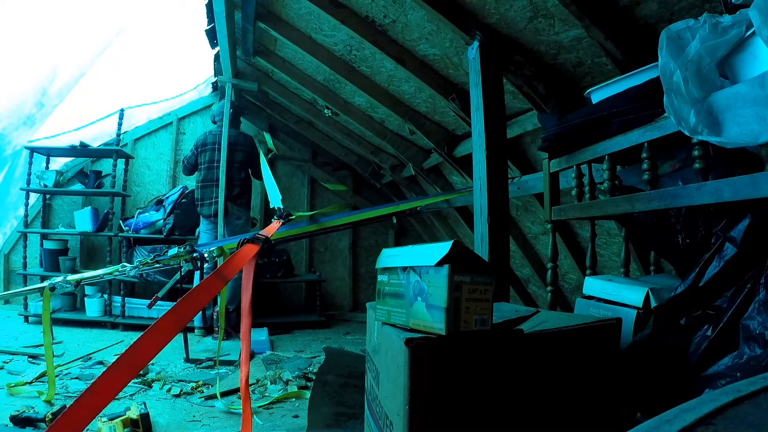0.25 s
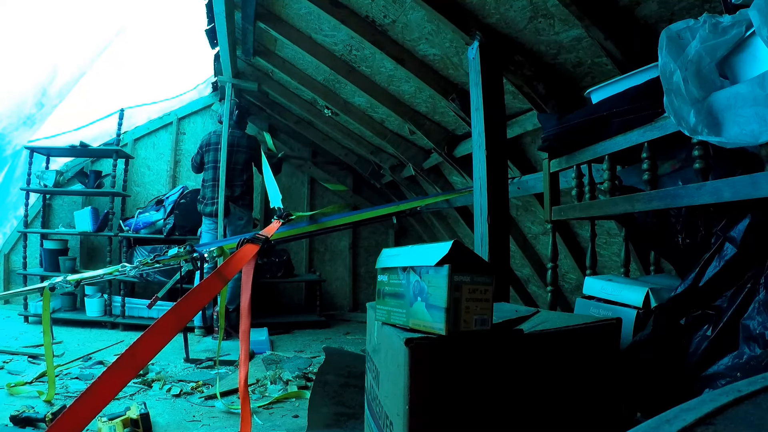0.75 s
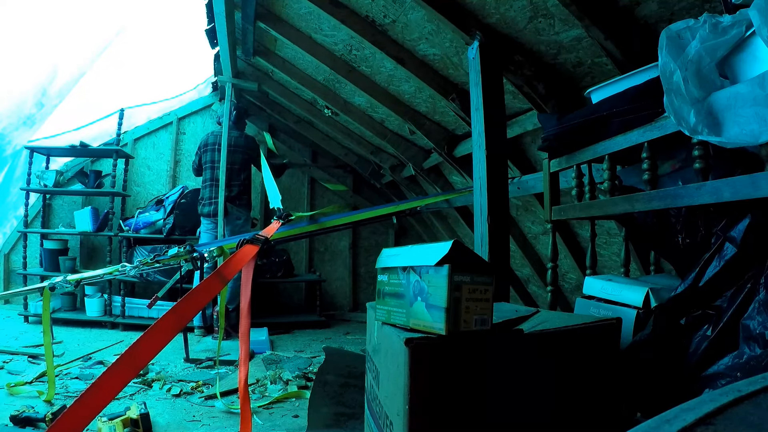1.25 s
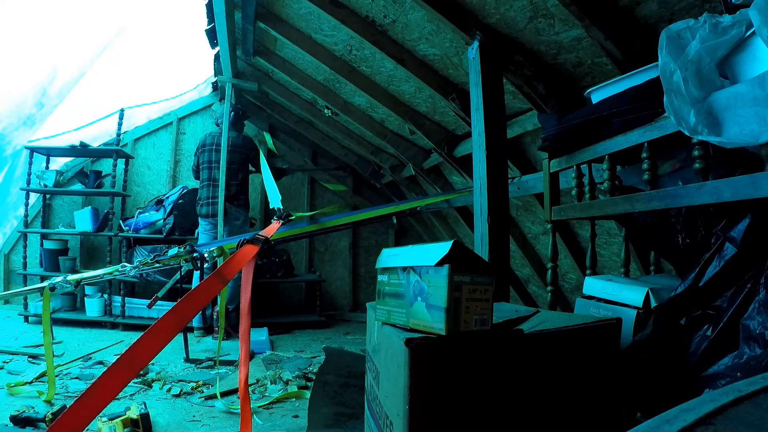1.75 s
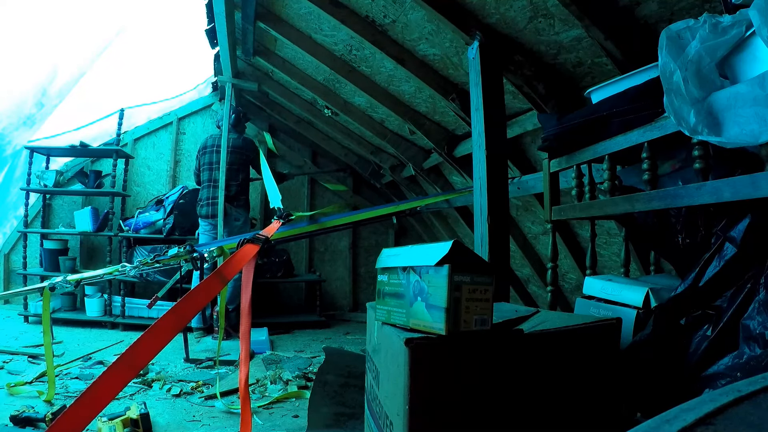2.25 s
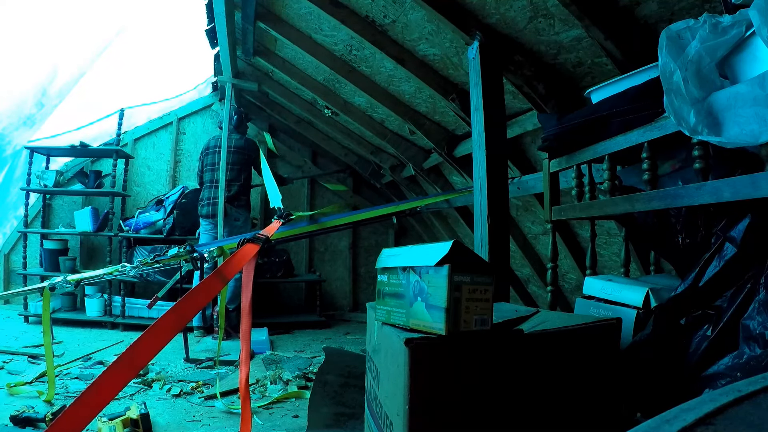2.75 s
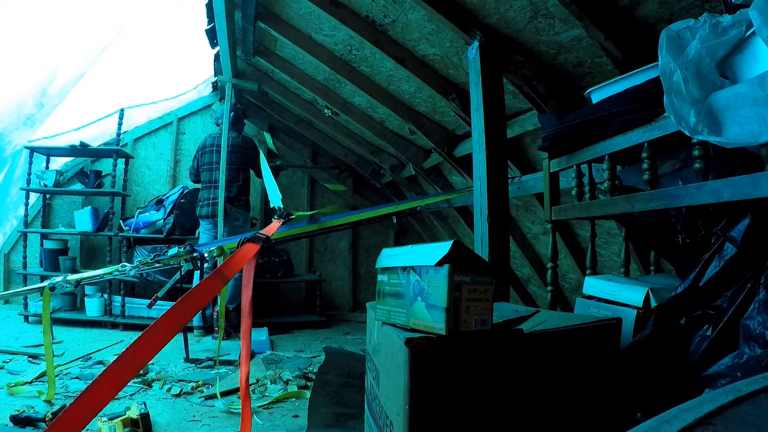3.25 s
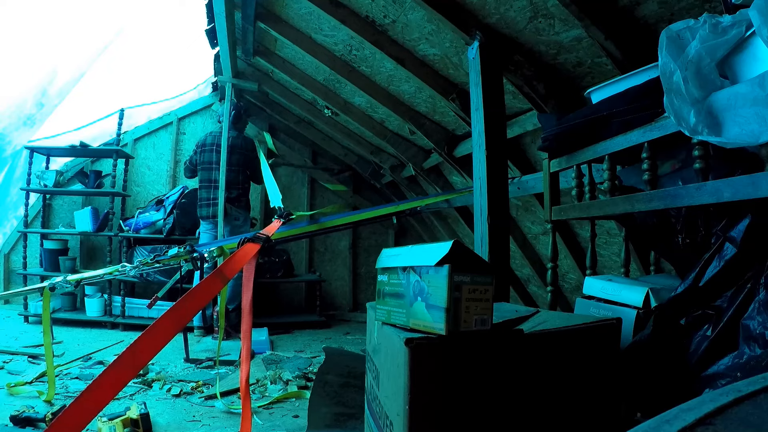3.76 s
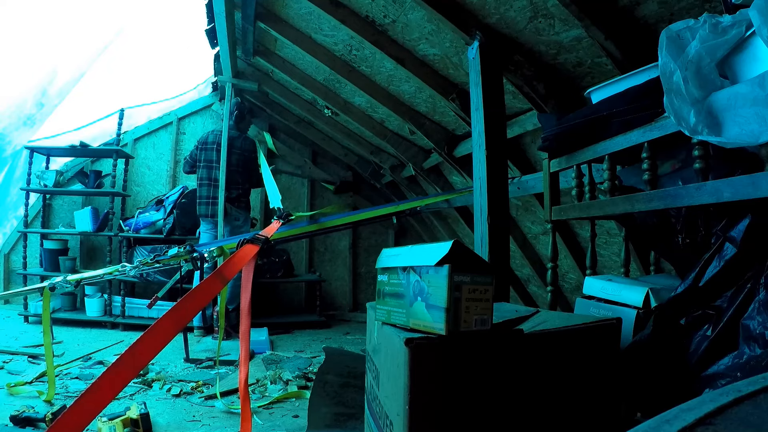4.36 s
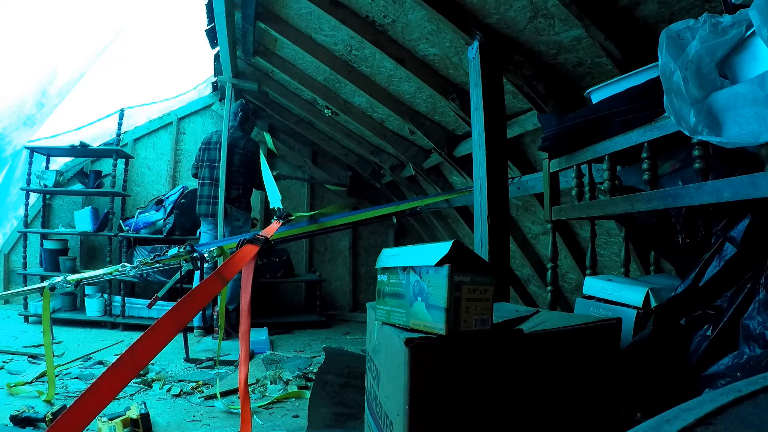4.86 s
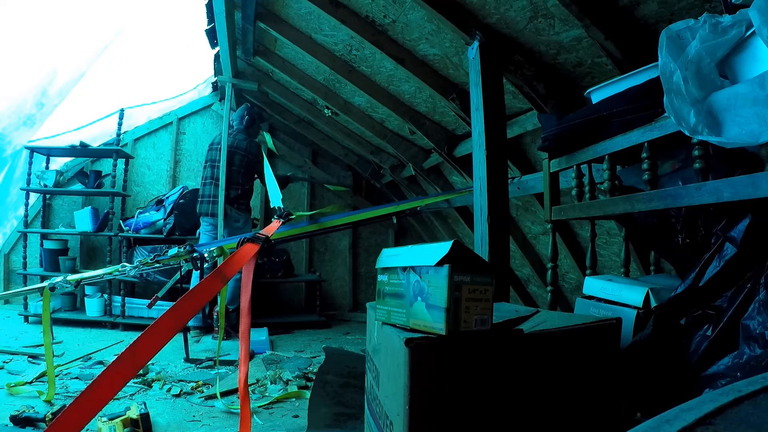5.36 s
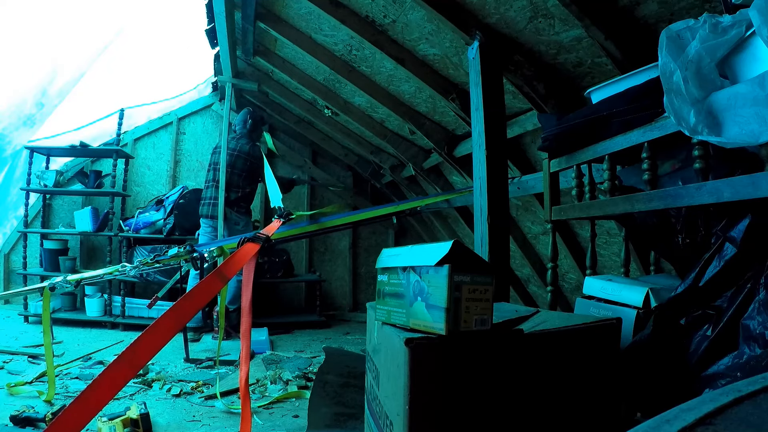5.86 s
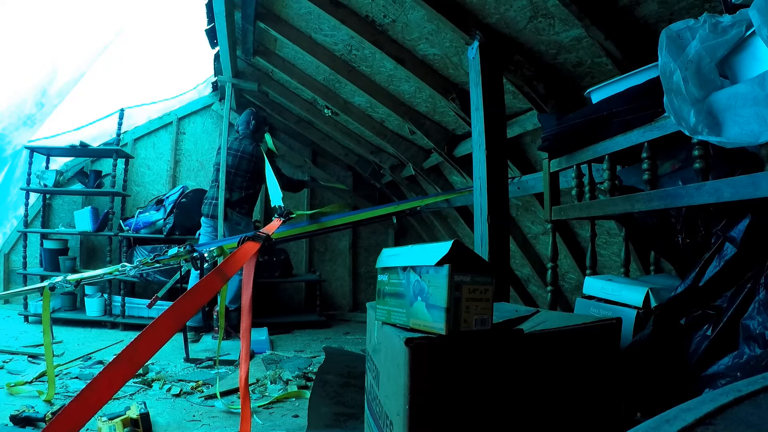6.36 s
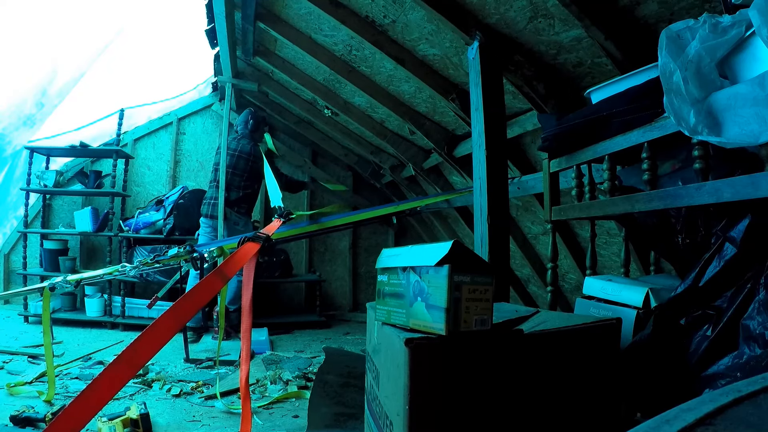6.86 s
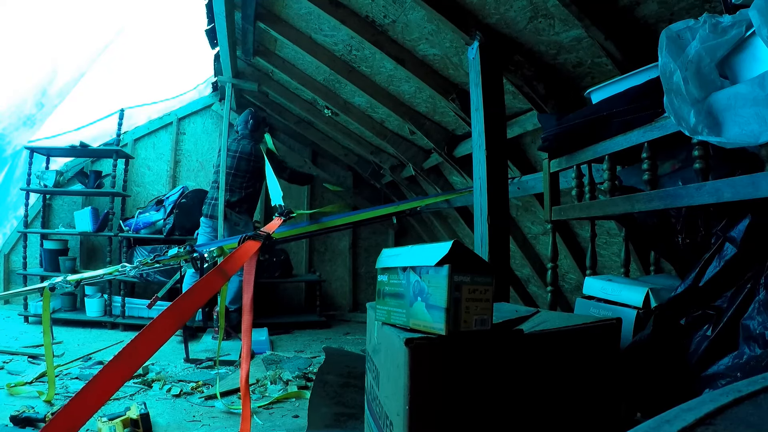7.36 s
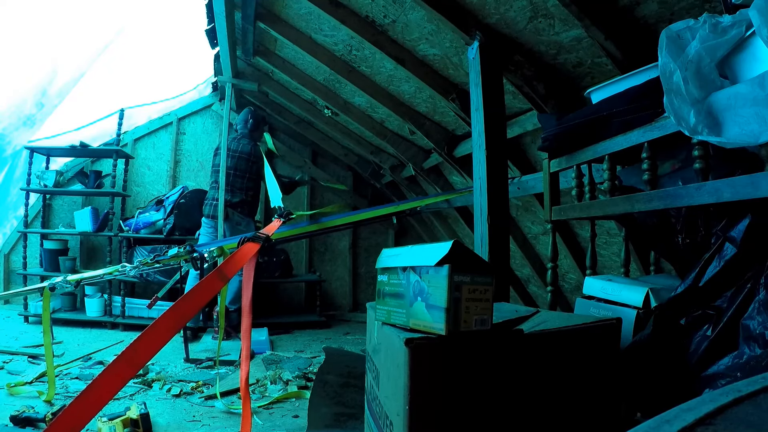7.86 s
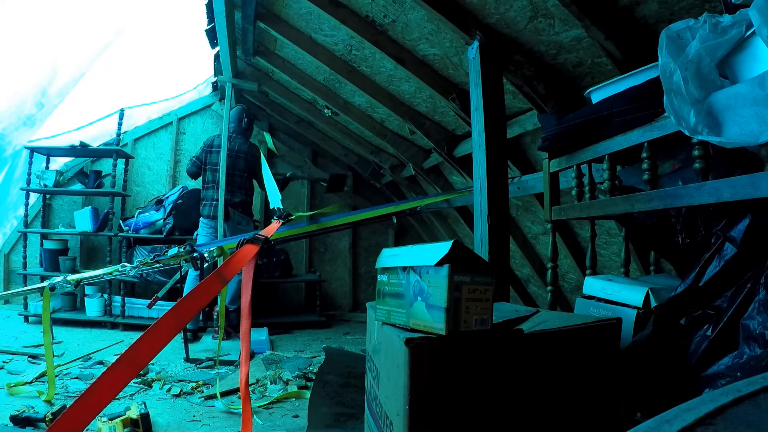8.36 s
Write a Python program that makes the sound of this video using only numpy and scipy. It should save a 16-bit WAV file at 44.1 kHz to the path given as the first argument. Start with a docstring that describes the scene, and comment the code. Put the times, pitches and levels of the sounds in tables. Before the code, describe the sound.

In a timber attic, a strap ratchet is worked some metres from a small stereo microphone pair. A bright click leads to a heavy thud before one second. Light ticks and knocks continue, then hard clanking blows land around 2.5, 3.5, 5.9 and 7.2 seconds. Low floor rumble sways beneath, a faint wavering hum comes and goes, and two weak taps end it.

```python
"""A ratchet strap is cranked tight in a timber attic, some metres from a small microphone pair.
Blows ring metal buckle and wooden frame as decaying sines, with bursts of noise and a hollow board's note;
noise keeps the floor swaying and a joist booming. A bright click leads to a heavy thud by 0.7 s; a faint
hum of wavering sines swells near 2.3 s, hard blows follow at 2.5 and 3.5 s, and the hum is back from 3.9 s.
The hard blows at 5.9 and 7.2 s give way to two weak ones after 8 s; soft filtered-noise air runs throughout."""
import sys
import numpy as np
from scipy import signal
from scipy.fft import rfft, irfft, next_fast_len
from scipy.io import wavfile
from scipy.ndimage import uniform_filter1d

SR = 44100
rng = np.random.default_rng(int(sys.argv[2]) if len(sys.argv) > 2 else 0)


def store_wav(level_fs):
    """Save 16-bit WAV to argv[1]."""
    pcm = np.round(np.clip(np.atleast_2d(level_fs), -1, 1) * 32767)
    wavfile.write(sys.argv[1], SR, pcm.T.astype(np.int16))


def magnitude_from_level(level_db):
    """Linear magnitude for a level in decibels (20 dB per decade)."""
    exponent = np.asarray(level_db, float) / 20
    return 10 ** exponent


N = 379693
PADDED = next_fast_len(N)   # samples in the Fourier transforms


def rms_one(x):
    """Scaled to rms 1."""
    return x / np.sqrt(np.mean(x ** 2) + 1e-20)


def in_time(rows):
    """Columns of a time table as curves, one value a sample."""
    s, *columns = np.transpose(rows)
    return [np.interp(np.arange(N) / SR, s, c) for c in columns]


def at_hz(points, index=1):
    """A column of a frequency table on the Fourier grid, joined along log frequency."""
    hz = np.maximum(np.fft.rfftfreq(PADDED, 1 / SR), 1)
    table = np.array(points)
    return np.interp(np.log(hz), np.log(table[:, 0]), table[:, index])


def coloured(spectrum):
    """White noise filtered to a given colour, rms 1."""
    white = rfft(rng.standard_normal(PADDED))
    return rms_one(irfft(white * magnitude_from_level(at_hz(spectrum)), PADDED)[:N])


def drift(rate):
    """Slow chance: random points of spread 1, rate per second (at most 40), joined by straight lines."""
    knots = rng.standard_normal(int(N / SR * 40) + 2)
    return np.interp(np.arange(N) / SR * rate, np.arange(len(knots)), knots)


def ring(x, hz, t60):
    """A resonator: a unit click sets a sine of height 1 ringing, 60 dB down after t60 seconds."""
    r, w = magnitude_from_level(-60 / (t60 * SR)), 2 * np.pi * hz / SR
    return signal.lfilter([0, np.sin(w)], [1, -2 * r * np.cos(w), r * r], x + 1e-18)


# blows of the ratchet, levels before the parts are mixed:
# (t/s, bright jingle level/dB, frame thud level/dB, wood knock level/dB, burst length/s)
BLOWS = [(0.153, -31.5, -58, -28.5, 0.031), (0.362, -46.5, -19.5, -27, 0.039), (0.675, -47, -5, -19, 0.026),
         (0.867, -48, -21.5, -27.5, 0.13), (1.187, -50, -19.5, -38.5, 0.074),
         (1.4063, -41.5, -30, -42, 0.11), (2.0157, -38, -19, -41, 0.062), (2.2553, -28.5, -27, -39, 0.11),
         (2.4403, -40, -35, -40.5, 0.12), (2.537, -23.5, -6, -14.5, 0.085),
         (2.7085, -38.5, -38, -35, 0.054), (3.0775, -41.5, -16, -33, 0.082), (3.312, -51, -16, -33, 0.05),
         (3.4046, -42.5, -30, -39, 0.071), (3.509, -51, -2.5, -21, 0.048), (3.8096, -62, -13.5, -36, 0.052),
         (4.093, -40.5, -25, -38.5, 0.029), (4.394, -46, -39.5, -35, 0.033),
         (5.3793, -39.5, -44, -31.5, 0.076), (5.9323, -27, -7.5, -12.5, 0.08),
         (6.047, -37, -15, -24, 0.095), (6.3477, -57, -29, -34.5, 0.14), (6.518, -37.5, -30, -33.5, 0.043),
         (6.705, -87, -21, -38, 0.053), (6.881, -46, -33.5, -43.5, 0.14), (7.1984, -31, -7.5, -13.5, 0.06),
         (8.12, -49.5, -30, -39.5, 0.15), (8.2548, -52.5, -32, -38, 0.24)]
# the clank lies between jingle and knock; a heavy, padded blow clanks less
CLANK_DB, CLANK_PER_JINGLE, CLANK_PER_THUD, CLANK_PER_KNOCK = -10, 0.41, -0.15, 0.48
BURST_TAIL_DB, BURST_TAIL_S = -11.5, 0.075   # loose parts rattle on
FIRM_DB, SOFTER_PER_DB = -49, 1.8   # weaker blows than this set in more slowly and click less


def strengths(part):
    """Level of every blow in dB for one part of its sound: clank, jingle, thud or knock."""
    jingle, thud, knock = np.array(BLOWS)[:, 1:4].T
    clank = CLANK_DB + CLANK_PER_JINGLE * jingle + CLANK_PER_THUD * thud + CLANK_PER_KNOCK * knock
    return {"clank": clank, "jingle": jingle, "thud": thud, "knock": knock}[part]


def bursts(part, rise_s, spread_db=0, lead_s=0):
    """Envelope of all blows: a quick rise, a rounded shoulder of rattling, a fast fall, a faint tail."""
    out = np.zeros(N)
    chance = spread_db * rng.standard_normal(len(BLOWS))
    t = np.arange(SR // 2) / SR
    for row, db in zip(BLOWS, strengths(part) + chance):
        at = round((row[0] - lead_s) * SR)
        slower = magnitude_from_level(-SOFTER_PER_DB * min(db - FIRM_DB, 0))
        rise = 1 - np.exp(-t / (rise_s * slower))
        tail = magnitude_from_level(BURST_TAIL_DB) * np.exp(-t / BURST_TAIL_S)
        fall = np.exp(-(t / row[-1]) ** 1.7) + tail
        out[at:at + len(t)] += magnitude_from_level(db) * (rise * fall)[:N - at]
    return out


RATTLES_PER_S = 500   # average number of random contacts


def struck(modes, part, click_db, rattle_db, contact_hz, lead_s=0, spread_db=2.5):
    """Each blow clicks and rattles every mode with chance strength; a low-pass softens the contact."""
    at = [round(row[0] * SR) for row in BLOWS]
    level = strengths(part)
    click_level = level + SOFTER_PER_DB * np.minimum(level - FIRM_DB, 0) + click_db
    out = np.zeros(N)
    for hz, level_db, t60 in modes:
        contacts = rng.standard_normal(N) * (rng.random(N) < RATTLES_PER_S / SR)
        kick = magnitude_from_level(rattle_db) * bursts(part, 0.0004, spread_db, lead_s) * rms_one(contacts)
        kick[at] += magnitude_from_level(click_level + rng.normal(0, 2.6, len(at)))
        out += magnitude_from_level(level_db) * ring(kick, hz, t60)
    return signal.sosfilt(signal.butter(2, contact_hz, fs=SR, output="sos"), out)


# ringing modes of the timber frame, of smaller wood and of the metal buckle:
# (f/Hz, relative level/dB, t60/s)
FRAME = [(104.8, 5, 0.16), (135, -4.5, 0.2), (189, -10, 0.36), (240, -4, 0.074)]
WOOD = [(308.4, -4.5, 0.083), (352, -0.5, 0.061), (475, 4, 0.023), (558, -3.5, 0.09), (629, 4.5, 0.03),
        (693, -2, 0.028), (796, -3, 0.029), (875, -8, 0.034)]
METAL = [(3190, 1, 0.06), (3530, -1, 0.06), (4345, -2, 0.07), (6090, 3, 0.09), (6730, 4, 0.06),
         (7560, 4, 0.06)]


def ratchet():
    """Buckle modes, wood knock and frame thud; the thud's rattle runs through the timber and comes first."""
    jingle = struck(METAL, "jingle", click_db=-29, rattle_db=-53, contact_hz=12000, spread_db=4)
    wood = struck(WOOD, "knock", click_db=-16, rattle_db=-29, contact_hz=1370)
    frame = struck(FRAME, "thud", click_db=-6.5, rattle_db=-40, contact_hz=282, lead_s=0.0022)
    return jingle + wood + frame


# colour of the noise in each blow: (f/Hz, relative level/dB)
CLACK = [(530, -14.5), (900, -4), (2410, -13.5), (4830, -18.5), (5300, -20.5), (7630, -17), (14900, -50)]


def clack():
    """The broad noise of each blow: the dull part follows the clank, the bright part the jingle."""
    noise = coloured(CLACK) * magnitude_from_level(0.97 * drift(40))
    dull = signal.sosfiltfilt(signal.butter(2, 4800, fs=SR, output="sos"), noise)
    bright = noise - dull
    dull_bursts = magnitude_from_level(-10.5) * bursts("clank", rise_s=0.00061) * dull
    return dull_bursts + magnitude_from_level(-3) * bursts("jingle", rise_s=0.0092) * bright


# single contacts with a note of their own, from pawl ticks to dull bumps:
# (t/s, starting level/dB before the mix, f/Hz, bandwidth/Hz, t60/s)
TICKS = [(1.949, -46, 3000, 1000, 0.18), (2.543, -30, 3600, 930, 0.036), (3.314, -50, 3250, 500, 0.18),
         (3.411, -54, 3460, 36, 0.38), (2.462, -53, 2300, 60, 0.6), (2.56, -49, 2565, 60, 0.5),
         (2.58, -49, 3150, 110, 0.35), (0.862, -49, 2300, 2200, 0.9), (8.163, -47.5, 3100, 1800, 0.1),
         (3.511, -19, 323, 205, 0.38), (4.092, -46, 3300, 1200, 0.16), (5.914, -6.5, 160.5, 38, 0.2),
         (5.995, -45, 3580, 80, 0.29), (6.07, -50.5, 3290, 120, 0.4), (6.349, -39.5, 1450, 1600, 0.087),
         (7.198, -20, 1600, 2200, 0.02), (7.198, -26, 1400, 660, 0.1), (3.094, -50, 3200, 570, 0.23)]


def ticks():
    """A dying scratch of noise through the resonance of the part that is touched."""
    out, noise = np.zeros(N), rng.standard_normal(N)
    for s, db, hz, width_hz, t60 in TICKS:
        at, t = round(s * SR), np.arange(int(t60 * SR)) / SR
        edges_hz = [max(hz - width_hz / 2, 50), hz + width_hz / 2]
        band = signal.butter(2, edges_hz, "band", fs=SR, output="sos")
        scratch = rms_one(signal.sosfilt(band, noise[at:at + len(t)]))
        out[at:at + len(t)] += magnitude_from_level(db - 60 * t / t60) * scratch
    return out


# hits on a hollow board that sings one note: (t/s, relative level/dB of the push)
BOARD = [(0.361, -38), (2.905, -51), (6.048, -26)]
BOARD_HZ, BOARD_T60_S = 503.8, 0.23


def board():
    """Two resonators in a row: the push lasts a moment, so the note swells before it dies."""
    push = np.zeros(N)
    push[[round(s * SR) for s, db in BOARD]] = magnitude_from_level(np.array(BOARD)[:, 1])
    swell = ring(push, BOARD_HZ * 1.012, 0.14)
    return ring(swell, BOARD_HZ, BOARD_T60_S) * magnitude_from_level(-29.5)


# the floor sways as weight shifts: (t/s, level/dB before the mix)
SWAY = [(0.0, -15.5), (0.55, -33.5), (0.76, -17.5), (1.94, -26), (2.01, -14), (2.62, -14), (2.72, -21),
        (2.99, -25.5), (3.07, -18.5), (5.87, -42.5), (5.99, -10), (6.54, -30), (7.3, -15.5), (8.1, -38),
        (8.21, -29.5), (8.61, -34.5)]
# a joist booms while it is loaded: (t/s, level/dB before the mix, time until it falls/s)
BOOMS = [(0.682, -16.5, 0.29), (2.3, -34.5, 0.59), (3.281, -25, 0.402), (3.949, -32, 0.45),
         (5.938, -35, 0.29), (7.2, -19, 0.08), (8.447, -33.5, 0.3)]
BOOM_RISE_S, BOOM_FALL_S, BOOM_UNDER_SWAY_DB = 0.037, 0.055, -17.5


def building():
    """Footing and strap tension, as noise, keep the floor's low modes going; returns shared and left-only."""
    sway_db, = in_time(SWAY)
    t = np.arange(N) / SR
    load = magnitude_from_level(sway_db + BOOM_UNDER_SWAY_DB)
    for s, db, held_s in BOOMS:
        rise = np.clip((t - s) / BOOM_RISE_S, 0, 1)
        fall = np.exp(-np.maximum(t - s - held_s, 0) / BOOM_FALL_S)
        load = load + magnitude_from_level(db) * rise * fall
    push = rng.standard_normal((3, N))
    sway = ring(push[:2], 29.8, 0.35) + magnitude_from_level(2.5) * ring(push[:2], 37.3, 0.25)
    boom = ring(push[2], 105.2, 0.47)
    # steady pushing evens out the swing
    sway = sway / np.sqrt(uniform_filter1d(sway ** 2, size=8000))
    boom = boom / np.sqrt(uniform_filter1d(boom ** 2, size=4000))
    return magnitude_from_level(sway_db) * sway[0] + load * boom, magnitude_from_level(sway_db - 11.5) * sway[1]


ATTIC_T60_S = 0.5


def attic(x):
    """Dense reflections from rafters and boxes: a dying noise tail, another one on each side."""
    t = np.arange(int(ATTIC_T60_S * SR)) / SR
    tail = rng.standard_normal((2, len(t))) * magnitude_from_level(-60 * t / ATTIC_T60_S) * (t > 0.004)
    tail /= np.sqrt(np.sum(tail ** 2, axis=1, keepdims=True))
    return signal.fftconvolve(x[None], tail, axes=1)[:, :N]


# a faint hum that comes and goes, one list for each time: (t/s, f/Hz, level/dB of the main tone before the mix)
HUM = [
    [(1.7, 169.9, -40.5), (2.3, 170.9, -28.5), (2.55, 180, -46)],
    [(3.9, 175.5, -34.5), (4.55, 165.8, -30.5), (5.1, 160.8, -37), (5.8, 174.1, -48)],
]
# how strong the upper partials are in each list: (relative level/dB)
HUM_UPPER_DB = [-15, 0]


def hum():
    """A wavering tone with two weak upper partials, faded in and out."""
    out, t = np.zeros(N), np.arange(N) / SR
    for rows, upper_db in zip(HUM, HUM_UPPER_DB):
        hz, db = in_time(rows)
        fade = np.clip(np.minimum(t - rows[0][0], rows[-1][0] - t) / 0.071, 0, 1)
        phase = 2 * np.pi * np.cumsum(hz + 0.4 * drift(5)) / SR
        tone = np.sin(phase)
        tone += magnitude_from_level(upper_db - 10.5) * np.sin(1.26 * phase)
        tone += magnitude_from_level(upper_db - 15.5) * np.sin(1.9 * phase)
        out += fade * magnitude_from_level(db) * np.sqrt(2) * tone
    return out


# the background before the mix: (t/s, dull air level/dB, hiss level/dB)
AIR = [(0.0, -29.5, -54), (1.2, -37, -59), (2.3, -30.5, -55), (2.49, -36, -56.5), (2.85, -36, -63.5),
       (4.29, -32.5, -58), (5.75, -36, -56.5), (7.1, -33.5, -57.5), (7.45, -39.5, -66.5), (7.85, -41, -65),
       (8.0, -38, -57), (8.61, -34.5, -53.5)]
# colours of the dull air and of the hiss: (f/Hz, relative level/dB)
DULL_AIR = [(29, -83.5), (50, 4), (91, -12), (177, -3.5), (253, -16), (399, -16.5), (1500, -41.5),
            (1950, -50.5), (3300, -120)]
HISS = [(710, -40), (1200, -2.5), (5080, -13), (6830, -4.5), (8000, -8), (12200, -16.5), (14000, -28),
        (14900, -38)]


def air():
    """Dull room air and a thin hiss: coloured noises, both flickering a little."""
    dull_db, hiss_db = in_time(AIR)
    dull = magnitude_from_level(dull_db + 3.3 * drift(7.4)) * coloured(DULL_AIR)
    hiss = magnitude_from_level(hiss_db + 0.97 * drift(17)) * coloured(HISS)
    return dull + hiss


# left port against the right one: (f/Hz, level/dB, phase/rad, share of air and clack alike in both)
PORTS = [(60, -1.5, -0.37, 1), (211, -2.5, 0.56, 0.85), (456, -8, 1, 1), (594, -25.5, 1.33, 0.46),
         (990, -1.5, 2.5, 0.54), (2840, 0.5, 0.92, 0.45), (7760, -0.5, 1.48, 0.96), (12100, -15.5, 1, 0.23)]


def scene():
    """Channel order left, right; the housing shades and shifts the left port."""
    hits = ratchet() + board() + ticks()
    sway, left_sway = building()
    near = hits + sway + hum()
    # noise heard by both ports, and fresh noise for the left one alone
    shared, other = air() + clack(), air() + clack()
    alike = np.clip(at_hz(PORTS, index=3), 0, 1)
    shade = magnitude_from_level(at_hz(PORTS)) * np.exp(1j * at_hz(PORTS, index=2))
    near_f, shared_f, other_f = rfft([near, shared, other], PADDED)
    left_f = (near_f + np.sqrt(alike) * shared_f) * shade + np.sqrt(1 - alike) * other_f
    left = irfft(left_f, PADDED)[:N]
    high_pass = signal.butter(2, 200, "high", fs=SR, output="sos")
    echo = signal.sosfilt(high_pass, attic(hits + magnitude_from_level(2.5) * clack()))
    return magnitude_from_level(1.5) * np.array([left + left_sway, near + shared]) + magnitude_from_level(-18) * echo


def band_limit(x):
    """A steep low-pass at the top of the band."""
    return signal.sosfilt(signal.butter(12, 15050, fs=SR, output="sos"), x)


def record(dry):
    """Loud peaks are rounded off smoothly."""
    rounded = 1.07 * np.tanh(dry / 1.109)
    return band_limit(rounded)


dry = scene()
out = record(dry)
store_wav(out)
```